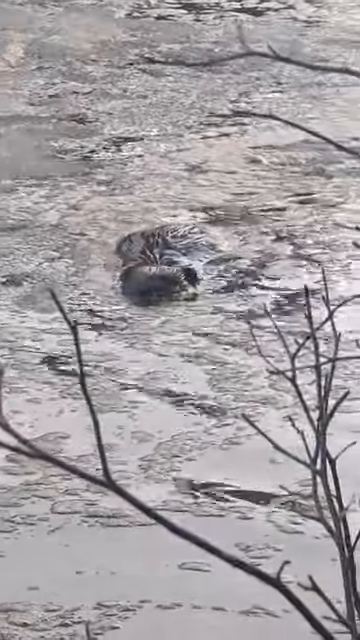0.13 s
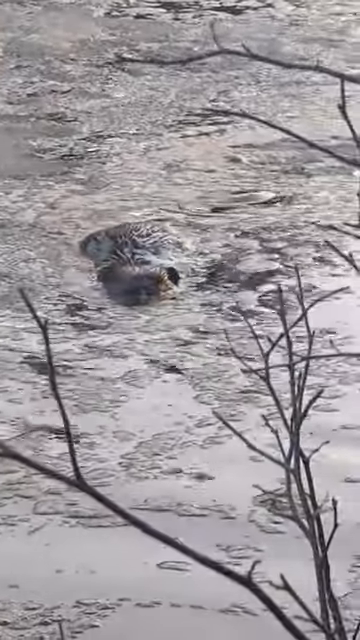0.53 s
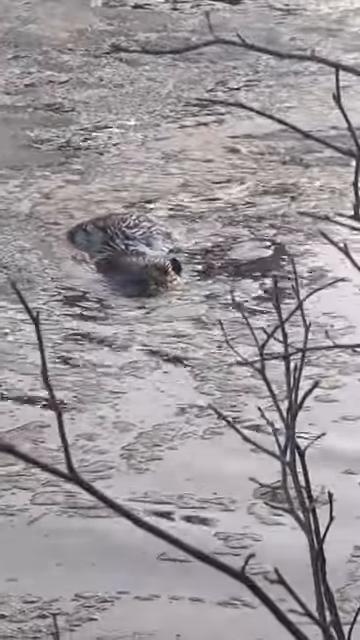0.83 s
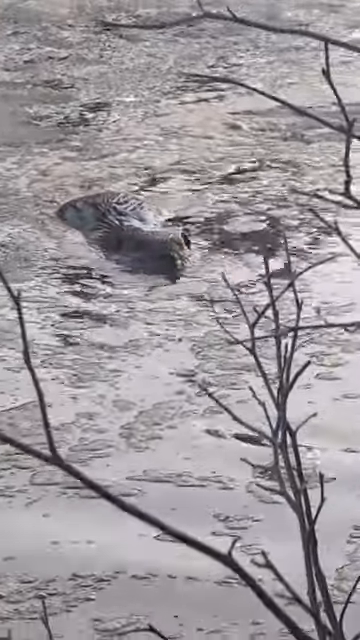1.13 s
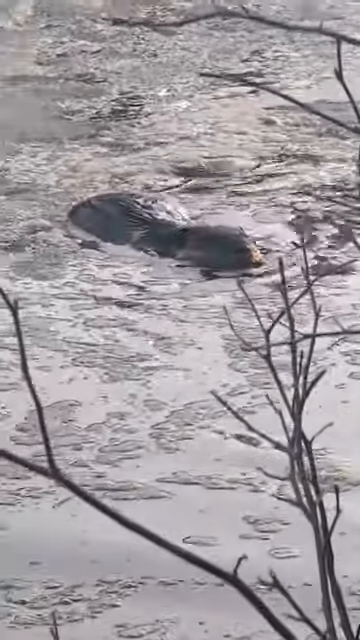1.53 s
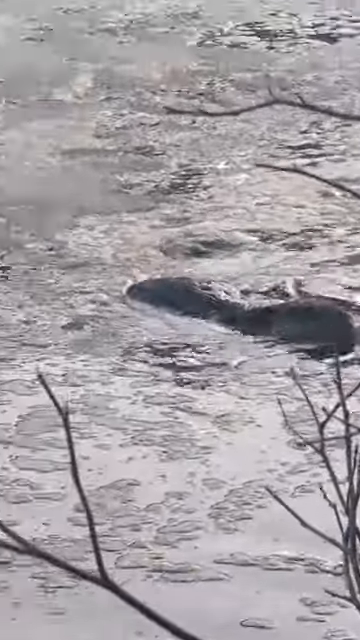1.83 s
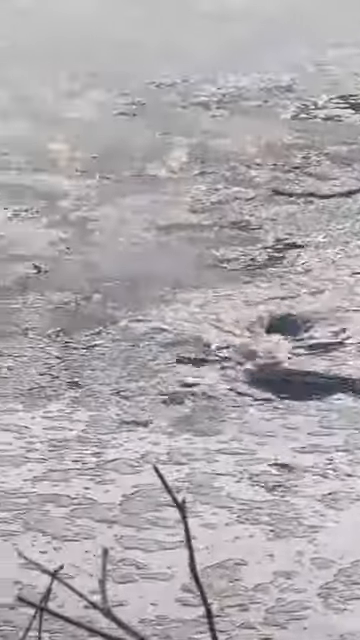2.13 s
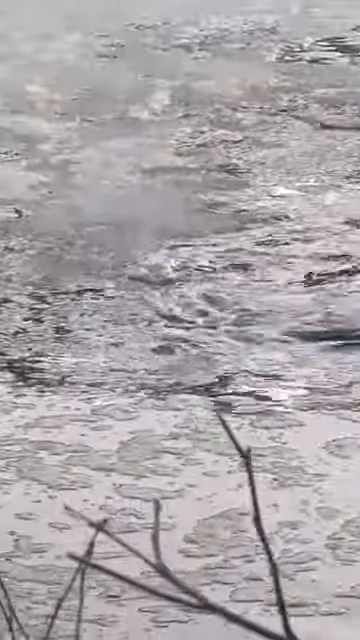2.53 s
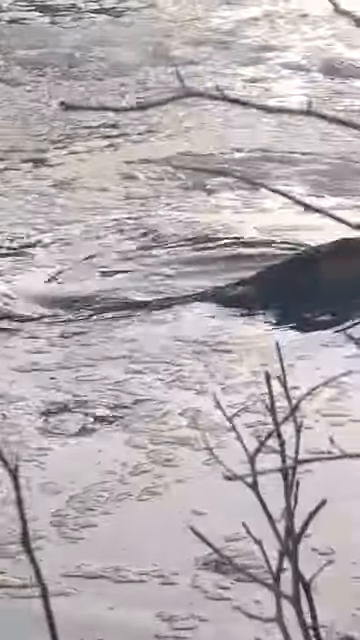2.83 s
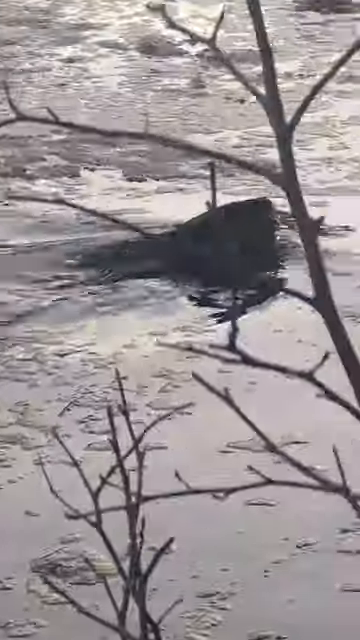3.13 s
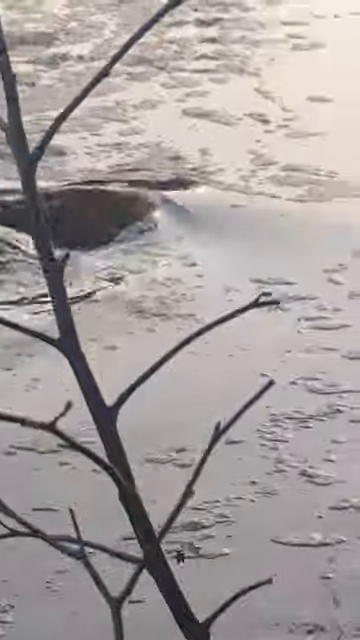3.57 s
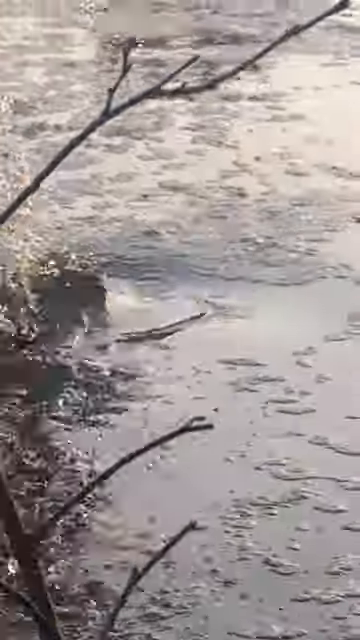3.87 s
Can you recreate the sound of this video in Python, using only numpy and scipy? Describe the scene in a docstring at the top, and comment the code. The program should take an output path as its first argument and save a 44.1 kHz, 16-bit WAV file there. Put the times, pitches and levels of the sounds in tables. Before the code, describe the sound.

A beaver smacks its tail and dives with a splash, after soft jacket rustling.

```python
"""A far machine hums over a soft outdoor rumble. Close on the right, a watcher's jacket rustles
against twigs. Then a beaver arches in a still pond with a gurgle, smacks its tail on the water
and dives; the hole it leaves closes with a deep gulp, bubbles and spray.
The hum, the gulp and each ringing pocket of air are sine tones.
The rumble, cloth, twigs, smack, slosh and spray are shaped noise."""
import sys
import numpy as np
from scipy import signal
from scipy.fft import rfft, irfft, next_fast_len
from scipy.io import wavfile
from scipy.ndimage import uniform_filter1d, map_coordinates

SR = 44100
rng = np.random.default_rng(int(sys.argv[2]) if len(sys.argv) > 2 else 0)


def generate_wav(signal):
    """Clip the signal to [-1, 1] and save it as 16-bit WAV at the path in sys.argv[1]."""
    frames = np.transpose(np.atleast_2d(signal))
    scaled = np.clip(frames, -1, 1) * 32767
    pcm = np.round(scaled).astype(np.int16)
    wavfile.write(sys.argv[1], SR, pcm)


N = 176400
TIME = np.arange(N) / SR  # seconds

# Short tones that sink in pitch. The last is a low thump as the hole closes; the rest come with the smack.
# Each row: start in seconds, pitch in Hz, peak in dB, rise time in milliseconds.
SINKING_TONES = [(3.5271, 885, -14, 0.32), (3.5285, 581, -15.5, 2.3), (3.5339, 275, -11.5, 1.86),
                 (3.533, 1800, -24.5, 1.6), (3.534, 1284, -28.5, 1.66), (3.7712, 177, -19, 1.74)]


def amp(db):
    """Turn decibels into a gain to multiply by."""
    return 10 ** (np.asarray(db) / 20)


def unit(x):
    """Scale a signal to an average (rms) level of 1."""
    return x / np.sqrt(np.mean(x ** 2) + 1e-20)


def along(points, hz):
    """Read between rows of (Hz, value), with octaves evenly spaced."""
    freqs, values = np.transpose(points)
    return np.interp(np.log(hz + 1), np.log(freqs + 1), values)


def curve(rows):
    """Join rows of (seconds, value) with straight lines, one value per sample."""
    return np.interp(TIME, *np.transpose(rows))


def wobble(rate):
    """A smooth curve through `rate` random points a second."""
    return map_coordinates(rng.standard_normal(int(N * rate / SR) + 4), [TIME * rate])


def filtered(x, response):
    """Change the strength and timing of each frequency by response(hz)."""
    size = next_fast_len(N + SR // 2)
    return irfft(rfft(x, size) * response(np.fft.rfftfreq(size, 1 / SR)), size)[..., :N]


def rush(spectrum, alike, patchy_db):
    """Stereo noise with loud and soft patches. Each row of alike: Hz, left-right likeness (1 = same)."""
    grid = signal.stft(rng.standard_normal((2, N)), nperseg=512)[2]
    patches = uniform_filter1d(uniform_filter1d(rng.standard_normal(grid.shape[1:]), 8, 0), 6, 1)
    pair = signal.istft(grid * amp(patchy_db * unit(patches)), nperseg=512)[1][:, :N]
    turn = lambda hz: np.arccos(np.clip(along(alike, hz), -1, 1)) / 2
    response = lambda hz: amp(along(spectrum, hz)) * [np.cos(turn(hz)), np.sin(turn(hz))]
    mid, side = filtered(pair, response)
    return unit(np.array([mid + side, mid - side]))


def placed(x, lag_s, pan_db):
    """Give a sound a direction: the left side is lag_s later and pan_db louder than the right."""
    side = np.array([[.5], [-.5]])
    response = lambda hz: amp(side * pan_db) * np.exp(-2j * np.pi * hz * side * lag_s)
    return filtered(x * np.ones((2, 1)), response)


def burst(start_s, db, fade_s):
    """A level that jumps up, then falls 60 dB in fade_s."""
    age = TIME - start_s
    return (age >= 0) * amp(db - 60 * np.clip(age, 0, 1) / fade_s)


def machine_hum(low_hz=71.2, high_hz=115.5, second_hz=111.9):
    """A far machine hums two unsteady tones; a second one joins and throbs against the higher tone."""
    # The low and the high tone. Each row: time in seconds, level in dB.
    low_levels = [(0, -56), (1.2, -50.5), (2.15, -52.5), (2.3, -70), (2.85, -74), (3, -55.5)]
    high_levels = [(0, -59.5), (.9, -51.5), (1.6, -54.5), (3.5, -56)]
    tone = lambda hz: np.sqrt(2) * np.sin(
        2 * np.pi * hz * TIME + 0.31 * wobble(6.07) + rng.uniform(0, 2 * np.pi))
    first = amp(curve(low_levels)) * tone(low_hz) + amp(curve(high_levels)) * tone(high_hz)
    fade_in = np.clip((TIME - 1.65) / .4, 0, 1)
    second = fade_in * amp(-64) * tone(second_hz)
    return (first + second) * amp([[-.4], [.4]])  # a touch louder on the right


def open_air():
    """The soft rumble of the outdoors, swaying a little in level."""
    # The rumble's tone. Each row: frequency in Hz, strength in dB.
    spectrum = [(20, -45), (40, -9.5), (60, -8.5), (100, -1.5), (190, -6.5), (240, -16.5), (360, -17.5),
                (460, -22), (790, -20.5), (1030, -30.5), (1300, -30), (3000, -46), (15000, -66)]
    # Deep sound is nearly the same on both sides. Each row: frequency in Hz, likeness from 0 to 1.
    alike = [(200, 0.93), (400, 0.81), (1000, 0.13)]
    return amp(-54 + .7 * wobble(3.04)) * rush(spectrum, alike, patchy_db=1.0)


def creases(count=520):
    """Small folds of cloth crackle at random: the levels of two separate streams of ticks."""
    when, size, stream = rng.uniform(size=(count, 3)).T
    ticks = np.zeros((2, N))
    ticks[(2 * stream).astype(int), (when * N).astype(int)] = amp(3 - 2.4 * np.log(size + 0.013))
    decay = burst(0, 0, fade_s=0.0035)[None, :SR // 20]
    return signal.fftconvolve(ticks, decay, axes=1)[:, :N]


def jacket():
    """Cloth rubs in fine, uneven grains: a low scrape and a high hiss, both crackling."""
    # The rubbing, and the scrape's level on top of that. Each row: time in seconds, level in dB.
    rubbing = [(0, -91), (.1, -76), (.22, -76.5), (.25, -69), (.33, -64), (.38, -74.5), (.42, -82.5),
               (.9, -86.5), (.94, -57), (1, -52), (1.1, -57.5), (1.18, -61), (1.29, -58), (1.35, -61.5),
               (1.45, -55.5), (1.64, -54), (1.75, -48.5), (1.84, -55), (2.1, -60), (2.2, -69), (2.28, -65),
               (2.34, -52), (2.45, -54), (2.51, -49.5), (2.58, -55), (2.68, -59), (2.76, -62), (2.83, -68),
               (2.92, -62.5), (2.99, -53.5), (3.08, -64.5), (3.42, -65.5)]
    scrape_boost = [(1, 0), (1.75, -2), (2.5, 2), (3, 2.5)]
    # The cloth's three tones. Each row: frequency in Hz, strength in dB.
    scrape_spectrum = [(300, -7.5), (850, -8), (1150, 0.5), (1700, -1.5), (2500, -4), (3500, -9),
                       (5000, -44)]
    hiss_spectrum = [(2500, -60), (4000, -2.5), (5000, -9), (6200, 0.5), (7900, -5.5), (10000, -3.5),
                     (11400, -9.5), (12400, -7), (15500, -17.5)]
    sheen_spectrum = [(7000, -38), (8900, 16), (11000, -34)]
    rub_db = curve(rubbing + [(rubbing[-1][0] + 0.12, -90)])  # fades after the last row
    crackle = creases()
    grain = unit(amp(0.91 * wobble(13) + 1.4 * wobble(90)))
    dull, bright = amp(rub_db) * (grain + crackle)
    alike = [(1000, 0.75), (6000, 0.12)]
    scrape = dull * amp(curve(scrape_boost)) * rush(scrape_spectrum, alike, patchy_db=0.5)
    hiss = bright * rush(hiss_spectrum, alike, patchy_db=2.0)
    stroke = np.clip(np.minimum(TIME - 2.3, 2.67 - TIME) / 0.07, 0, 1)  # one stroke sings faintly
    sheen = bright * stroke * amp(-7) * rush(sheen_spectrum, alike, patchy_db=-5.0)
    return scrape + hiss + sheen


def twigs(width=1.7):
    """Twigs and creases snap: bursts of noise, each in a band `width` times its centre frequency."""
    # The snaps. Each row: start in seconds, starting level in dB, centre frequency in Hz.
    snaps = [(.24, -54.5, 6000), (0.327, -48, 3770), (1.305, -45.5, 4000), (1.385, -47, 6870),
             (1.429, -45, 1700), (1.654, -41.5, 4960), (1.789, -40.5, 1290), (2.244, -47.5, 8700),
             (2.638, -59, 2480)]
    sound = np.zeros(N)
    for start_s, db, centre in snaps:
        band = lambda hz: 1j * hz * centre * width / (centre ** 2 - hz ** 2 + 1j * hz * centre * width)
        sound += burst(start_s, db, fade_s=0.018) * unit(filtered(rng.standard_normal(N), band))
    return sound


def bubbles(rows, glide_octaves):
    """Air in water rings as a tone that swells and dies, sliding glide_octaves in two rise times."""
    start_s, hz, db, rise_ms = np.transpose(rows)[:, :, None]
    samples = np.arange(SR // 12)
    age = 1000 * samples / SR / rise_ms  # counted in rise times
    pitch = hz * 2 ** (glide_octaves * np.minimum(age, 4) / 2)
    rings = amp(db) * age * np.exp(1 - age) * np.sin(2 * np.pi * np.cumsum(pitch, axis=1) / SR)
    positions = (np.round(start_s * SR) + samples).astype(int)
    return np.bincount(positions.ravel(), rings.ravel(), N + SR)[:N]


def gurgle():
    """Single pockets of air ring in the stirred water, each climbing in pitch."""
    # The pockets. Each row: start in seconds, pitch in Hz, peak in dB, rise time in milliseconds.
    pockets = [(2.516, 565, -35, 1.1), (3.242, 1400, -45, 0.8), (3.256, 814, -47, 3),
               (3.275, 2280, -43.5, 2.8), (3.278, 950, -41, 2.2), (3.312, 635, -35, 3),
               (3.327, 716, -41, 2.8), (3.359, 3300, -44, 1.5), (3.369, 4120, -47, 0.82),
               (3.374, 913, -50, 3), (3.394, 1380, -41.5, 3.4), (3.408, 1745, -38, 3.4),
               (3.407, 3300, -32, 0.38), (3.412, 1140, -45, 4.3), (3.433, 532, -42.5, 5.3),
               (3.458, 620, -41.5, 4.7), (3.461, 1130, -45, 2.1), (3.486, 1510, -38, 0.94),
               (3.576, 287, -37.5, 3.5), (3.694, 630, -36.5, 2.1), (3.702, 238, -32, 3.5),
               (3.724, 247, -28, 3.6), (3.749, 1470, -35, 3.7), (3.754, 197, -27, 8.9),
               (3.766, 478, -27, 1.9), (3.799, 1084, -34, 4.8), (3.814, 492, -26.5, 2.6),
               (3.826, 542, -27, 3.8), (3.841, 1080, -39.5, 2.9), (3.852, 600, -37, 6.4),
               (3.913, 571, -35.5, 5.1), (3.972, 584, -36.5, 3.3)]
    return bubbles(pockets, glide_octaves=0.086)


def swarm(from_s, centre_hz, spread_octaves, rise_cycles, count):
    """A crowd of small random bubbles from from_s on, most of them climbing in pitch."""
    when, size = rng.uniform(size=(count, 2)).T
    pitch, glide = rng.standard_normal((count, 2)).T
    hz = np.clip(centre_hz * 2 ** (spread_octaves * pitch), 400, 5000)
    start_s = from_s + when * (N / SR - from_s)
    size_db = -3 * np.log(size + 0.024)
    rows = np.transpose([start_s, hz, size_db, 1000 * rise_cycles / hz])
    sound = bubbles(rows, glide_octaves=0.095 + 0.087 * glide[:, None])
    return sound / np.std(sound[round(from_s * SR):])


def churn():
    """Stirred water sloshes, full of bubbles and short, higher droplets."""
    # How hard the water bubbles. Each row: time in seconds, level in dB.
    bubbling = [(3.22, -67.5), (3.3, -59), (3.41, -51), (3.5, -61), (3.548, -40), (3.62, -59), (3.68, -50),
                (3.77, -44.5), (3.88, -48), (4, -47)]
    # The slosh's tone. Each row: frequency in Hz, strength in dB.
    slosh_spectrum = [(60, 2), (300, -1), (600, -6), (1600, 2), (3100, -19), (4300, -13), (5200, -36)]
    from_s = bubbling[0][0]
    level_db = curve([(from_s - .06, -100)] + bubbling)
    froth = swarm(from_s, centre_hz=644, spread_octaves=0.484, rise_cycles=2.76, count=340)
    drops = swarm(from_s, centre_hz=1686, spread_octaves=0.534, rise_cycles=1.95, count=520)
    slosh = rush(slosh_spectrum, alike=[(200, 1.0), (2000, 0.42)], patchy_db=2.5)
    return amp(level_db) * (froth + amp(-1) * drops + slosh)


def spray():
    """Thrown water falls back with a flickering hiss."""
    # The falling spray. Each row: time in seconds, level in dB.
    falling = [(3.39, -58), (3.408, -48), (3.422, -49.5), (3.47, -56), (3.51, -44), (3.527, -37),
               (3.6, -45), (3.7, -48), (3.77, -43), (4, -47)]
    # Its tone. Each row: frequency in Hz, strength in dB.
    spectrum = [(1500, -7.5), (2200, -5.5), (3200, -13), (4300, -9.5), (5200, -14.5), (7000, -13),
                (15500, -20.5)]
    level_db = curve([(falling[0][0] - .1, -100)] + falling)
    flicker = unit(amp(1.14 * wobble(300) + 1.45 * wobble(30)))
    return amp(level_db) * flicker * rush(spectrum, alike=[(3000, 0.2), (10000, 0.089)], patchy_db=1.5)


def tail_smack():
    """The flat tail cracks on the water, and the air it pushes under rings with a falling pitch."""
    # The crack's tone. Each row: frequency in Hz, strength in dB.
    spectrum = [(800, -12.5), (1600, 5), (2600, -10), (3300, 0.5), (8000, -15.5), (15000, -6.5)]
    crack = burst(start_s=3.5268, db=-22, fade_s=0.036) * rush(spectrum, [(1000, 0.16)], patchy_db=2)
    return crack + bubbles(SINKING_TONES[:-1], glide_octaves=-0.21)


def gulp(start_s=3.7745, deep_hz=67.7, settle_s=0.0038, rise_s=0.00085, fade_s=0.23):
    """The hole closes with a low thump, then rings, dropping almost an octave to a deep note."""
    thump = bubbles(SINKING_TONES[-1:], glide_octaves=-0.21)
    age = np.clip(TIME - start_s, 0, 1)
    pitch = deep_hz * 2 ** (0.93 * np.exp(-age / settle_s))
    phase = 2 * np.pi * np.cumsum((age > 0) * pitch) / SR
    swell = 1 - np.exp(-age / rise_s)
    fade = amp(-17.5 - 60 * (age / fade_s) ** 1.17)  # the fall gets steeper as it goes
    return thump - swell * fade * np.sin(phase)


def bank_echo(splash, fade_s=.1, low_cut_hz=500):
    """The shore scatters back a short, dull echo; the deepest tones pass over it."""
    t = np.arange(SR // 4) / SR
    scatter = uniform_filter1d(rng.standard_normal((2, len(t))), size=5, axis=1) * amp(-60 * t / fade_s)
    echo = signal.fftconvolve(splash, scatter / np.linalg.norm(scatter[0]), axes=1)[:, :N]
    return filtered(echo, lambda hz: hz ** 2 / (hz ** 2 + low_cut_hz ** 2))


def scene():
    """Mix it all: the pond reaches the left side first, and the jacket is near on the right."""
    splash = gurgle() + tail_smack() + gulp()
    wash = amp(-11) * bank_echo(splash) + churn() + spray()
    pond = placed(splash, lag_s=-0.00017, pan_db=-1.4) + placed(wash, lag_s=-0.00021, pan_db=-1.4)
    watcher = placed(jacket() + twigs(), lag_s=0.000478, pan_db=-6)
    return machine_hum() + open_air() + watcher + pond


def record(dry, low_cut_hz=36.4, top_hz=15700):
    """The camera thins the deepest bass and keeps nothing above top_hz."""
    return filtered(dry, lambda hz: (hz < top_hz) * (1j * hz / (low_cut_hz + 1j * hz)) ** 2)


dry = scene()
out = record(dry)
generate_wav(out)
```